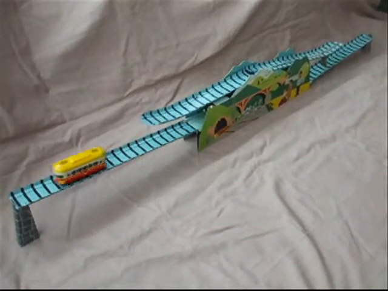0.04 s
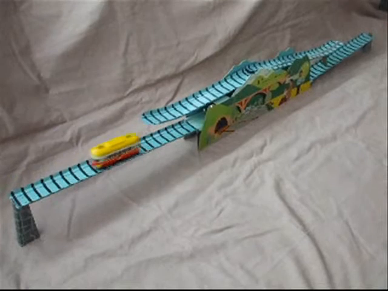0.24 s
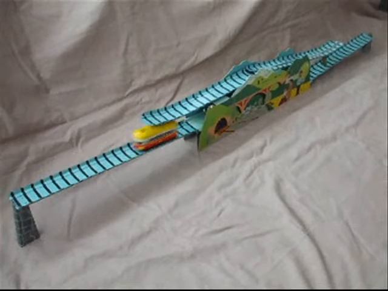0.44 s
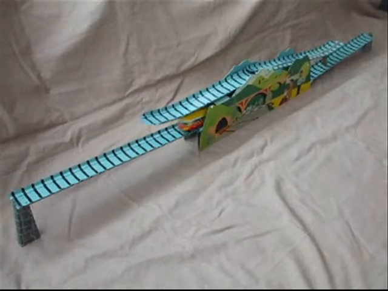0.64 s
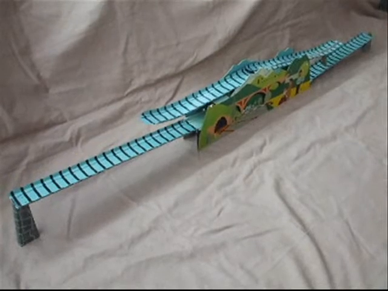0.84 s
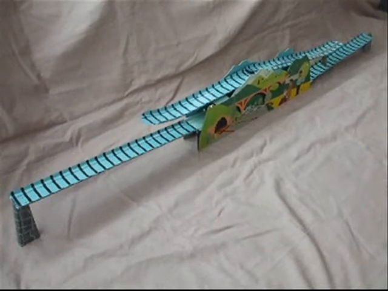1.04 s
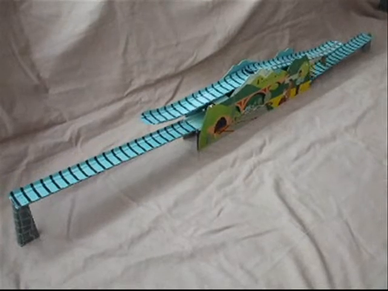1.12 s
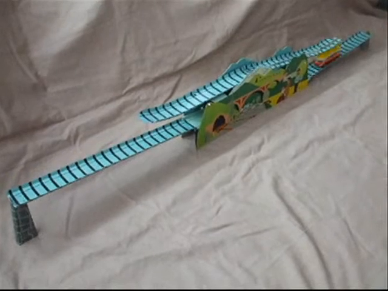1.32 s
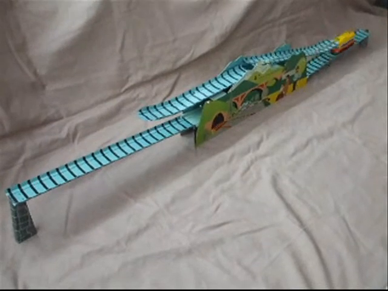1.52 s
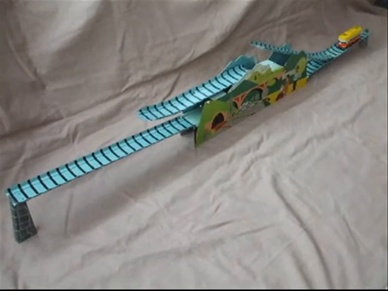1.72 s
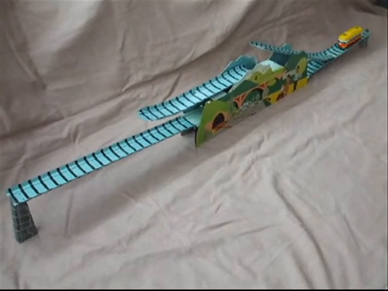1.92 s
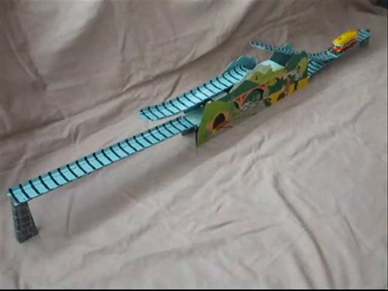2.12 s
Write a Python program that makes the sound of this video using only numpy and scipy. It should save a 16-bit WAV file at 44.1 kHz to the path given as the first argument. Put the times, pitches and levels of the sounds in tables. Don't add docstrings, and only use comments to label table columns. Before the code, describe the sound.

Clockwork toy on metal track: quiet gear chatter and ticking joints build to a booming tinny roar in a tunnel, drop suddenly after sharp knocks, and end in two short clacks, indoors, with harsh lo-fi treble.

```python
import sys
import numpy as np
from scipy import signal
from scipy.fft import rfft, irfft, next_fast_len
from scipy.io import wavfile
from scipy.ndimage import uniform_filter1d

SR = 44100
rng = np.random.default_rng(int(sys.argv[2]) if len(sys.argv) > 2 else 0)


def convert_level_to_amplitude(level_db):
    exponent = np.asarray(level_db, float) / 20
    return 10 ** exponent


def to_wav(sig):
    pcm = np.clip(np.atleast_2d(sig), -1, 1) * 32767
    pcm = np.round(pcm).astype(np.int16)
    wavfile.write(sys.argv[1], SR, pcm.T)


N = 94815


def rms(x):
    return np.sqrt(np.mean(x ** 2))


def unit(x):
    return x / rms(x)


def peak_one(x):
    return x / np.abs(x).max()


def colour(x, points):
    p = np.array(points, float)
    hz = np.maximum(np.arange(2049) * SR / 4096, 1)
    log_gain = np.interp(np.log(hz), np.log(p[:, 0]), p[:, 1]) * np.log(10) / 20
    cepstrum = irfft(log_gain)
    cepstrum[1:2048] *= 2
    cepstrum[2049:] = 0
    return signal.fftconvolve(x, irfft(np.exp(rfft(cepstrum))))[:len(x)]


def ring(x, hz, t60):
    pole = np.exp((2j * np.pi * hz - np.log(1000) / t60) / SR)
    return signal.lfilter([1], [1, -pole], x).imag


def walk(hz):
    return unit(signal.lfilter(*signal.butter(2, hz, fs=SR), rng.standard_normal(N)))


def clicks(per_s, scatter_db):
    chance, sign, strength = rng.random((3, N))
    ticks = (chance < per_s / SR) * np.sign(sign - .5)
    return unit(ticks * convert_level_to_amplitude(-scatter_db * np.log(strength + 1e-4)))


def rings(x, peaks):
    stretch_s, away_db = 0.18, -11.5
    shift_db, shift_hz = 1.2, 12
    sharpen = .88
    t, out = np.arange(N) / SR, 0
    for k, (hz, width_hz, db, loudest_s) in enumerate(peaks):
        away = 1 - np.exp(-((t - loudest_s) / stretch_s) ** 2)
        db = db + away_db * away + shift_db * walk(shift_hz)
        t60 = np.log(1000) / (np.pi * max(sharpen * width_hz, 10))
        out = out + (-1) ** k * np.sqrt(width_hz) * ring(x * convert_level_to_amplitude(db), hz, t60)
    return unit(out)


def gear_chatter(teeth):
    # pitch_hz, level_db
    teeth_colour = [(710, -18.5), (1200, -2), (1780, -6), (2710, -0.5), (3000, -4.5), (4490, -4),
                    (5500, -6), (7150, -55), (12100, -120)]
    # pitch_hz, width_hz, level_db, loudest_s
    body_rings = [(2250, 120, 3, 0.086), (2448, 16, 4.5, 0.16), (2708, 200, 3, 0.57), (3414, 18, -3, 0.27),
                  (3490, 39, 1, 0.63), (3870, 37, -3.5, 0.21), (4135, 66, 3.5, 0.69), (4540, 250, 1, 0.52),
                  (2030, 42, -10, 0.53), (2395, 83, 0, 0.6), (4620, 19, -7, 1.2), (4944, 280, 1, 1.414),
                  (3060, 340, 1, 1.43), (4120, 94, 2, 1.414)]
    ring_db = -1.5
    gears = unit(colour(teeth, teeth_colour)) + convert_level_to_amplitude(ring_db) * rings(teeth, body_rings)
    return convert_level_to_amplitude(-3.5) * gears * rms(teeth)


def track_rumble(wheels, t):
    # pitch_hz, level_db
    track_colour = [(88, -43), (150, -28.5), (481, -8.5), (532, -6.5), (805, -1.5), (1280, -16),
                    (1430, -19.5), (3000, -22), (3900, -41), (6600, -120)]
    # pitch_hz, width_hz, level_db, loudest_s
    track_rings = [(402.4, 13, -5, 0.11), (602, 39, -4.5, 0.83), (655, 14, -24, 0.16), (836, 61, 3, 0.31),
                   (945, 84, -13, 0.39), (1081.5, 6.1, 1.5, 0.12), (1081.5, 78, 6, 0.61),
                   (1233, 75, 3, 0.13), (460, 71, -1.5, 0.81), (570, 190, -3.5, 1.28), (736, 137, 2, 1.71),
                   (1057, 19, -1, 1.74), (1233, 105, 1.5, 1.67), (727, 40, 2, 1.87)]
    # pitch_hz, width_hz, level_db, loudest_s
    tunnel_rings = [(427, 93, -21, 1.3), (612, 20, -11, 0.84), (672, 25, -4, 1.065), (742, 9.9, 0.5, 1.036),
                    (815, 50, 2, 0.98), (838, 11, -3, 1.25), (964, 81, -6.5, 0.82), (1042, 9.4, -5, 1.03),
                    (1087, 9.2, -5, 0.66), (1184, 75, -3, 1.07), (1350, 110, -2, 0.89), (1504, 75, -4, 1),
                    (1604.5, 56, -5, 1.026), (1945, 72, -6, 0.93)]
    tunnel_in_s, tunnel_out_s, enter_s, leave_s = 0.777, 1.31, 0.05, 0.0081
    ring_db, rumble_db = 1.5, -2
    entered = np.clip((t - tunnel_in_s) / enter_s + .5, 0, 1)
    inside = entered * np.clip((tunnel_out_s - t) / leave_s + .5, 0, 1)
    outdoors, indoors = wheels * np.sqrt(1 - inside), wheels * np.sqrt(inside)

    track = convert_level_to_amplitude(rumble_db) * rms(wheels) * unit(colour(wheels, track_colour))
    track = track + convert_level_to_amplitude(ring_db) * rms(outdoors) * rings(outdoors, track_rings)
    track = track + convert_level_to_amplitude(ring_db) * rms(indoors) * rings(indoors, tunnel_rings)

    even = int(.07 * SR)

    def power(x):
        return uniform_filter1d(uniform_filter1d(x ** 2, even), even)

    return convert_level_to_amplitude(-2.0) * track * np.sqrt(2 * power(wheels) / power(track))


def car(t):
    # start_s, gear_chatter_db, track_rumble_db
    run = [(0, -47, -46.5), (.11, -41, -40), (.19, -40, -39.5), (0.269, -33, -36), (.48, -34, -36),
           (0.562, -29.5, -33), (0.632, -33.5, -38), (.68, -29, -32.5), (0.899, -26.5, -24.5),
           (1.12, -25, -19), (1.297, -23.5, -26), (1.32, -31, -38), (1.48, -37.5, -37), (1.538, -31, -38.5),
           (1.63, -41.5, -41), (1.81, -48, -48), (1.899, -44, -40.5), (2.0, -63, -59)]
    s, gear_db, track_db = np.array(run).T
    flicker_db, flicker_hz = 1.58, 26
    teeth, wheels = clicks(5000, 1.9), clicks(3000, 1.7)
    shake = flicker_db * walk(flicker_hz)
    teeth = teeth * convert_level_to_amplitude(np.interp(t, s, gear_db) + shake)
    wheels = wheels * convert_level_to_amplitude(np.interp(t, s, track_db) + 0.17 * shake)
    return gear_chatter(teeth), track_rumble(wheels, t)


def hits():
    # start_s, peak_db, ring_hz, bouncing_s
    blows = [(0.0662, -30.5, 2100, 0.015), (0.0931, -23.5, 3540, 0.0041), (0.1106, -21.5, 3670, 0.0085),
             (0.186, -33, 2250, 0.0077), (0.2132, -27, 2520, 0.011), (0.384, -45, 3180, 0.014),
             (0.4144, -22.5, 4240, 0.032), (0.5175, -24, 5100, 0.018), (0.536, -17, 4600, 0.013),
             (0.558, -23, 2780, 0.012), (0.59, -17.5, 2720, 0.012), (0.638, -17, 2860, 0.014),
             (0.6619, -13.5, 2760, 0.01), (0.682, -19, 2780, 0.0068), (0.789, -14.5, 1370, 0.045),
             (0.8609, -16.5, 3400, 0.01), (0.9093, -16, 2100, 0.016), (1.0306, -12, 3230, 0.1),
             (1.2355, -12.5, 5070, 0.026), (1.3117, -10.5, 4850, 0.028), (1.3386, -10.5, 4620, 0.039),
             (1.3566, -18, 3900, 0.05), (1.5127, -24, 3540, 0.034), (1.533, -19, 4700, 0.01),
             (1.653, -15.5, 4650, 0.0084), (1.6554, -16, 5000, 0.012), (1.6624, -15, 4020, 0.042),
             (1.6804, -31, 4060, 0.017), (1.7185, -21.5, 4240, 0.017), (1.724, -20.5, 3620, 0.019),
             (1.819, -23.5, 3500, 0.0045), (1.8221, -17, 2530, 0.039), (1.8257, -13, 4360, 0.013),
             (1.8375, -16, 4300, 0.0087), (1.8408, -19, 3000, 0.0084), (1.8512, -22.5, 4260, 0.027),
             (1.857, -21, 3000, 0.049), (2.0698, -29.5, 3680, 0.022), (2.1385, -25.5, 4380, 0.012)]
    # pitch_hz, level_db
    knock_colour = [(60, -39), (200, -17.5), (700, -0.5), (1400, -10), (2200, -3), (3200, -1), (4500, 5),
                    (5600, 0.5), (9000, -17.5)]
    # pitch_hz, level_db, t60_s
    tin_modes = [(649, -2, 0.14), (1840, -6, 0.15), (1986, -4.5, 0.11), (2200, -15, 0.065),
                 (2680, -4, 0.22), (3000, 2.5, 0.083), (3446, 3, 0.058), (3310, 1, 0.089), (3970, -7, 0.04),
                 (4240, -1, .12), (4200, -20, .12), (4620, -34, 0.079), (5000, 1, 0.19), (5280, -20, .09)]
    bounces_per_s, bounce_db = 6000, -8
    crunch_s, rise_s = .002, .0007
    knock_db, own_ring_db, own_t60_s = -1, -7, .013
    tin_db, tin_scatter_db = -10.5, 2

    knocks, own = np.zeros((2, N + SR))
    t = np.arange(SR // 8) / SR
    fade_out = np.hanning(2 * len(t))[len(t):]
    for s, db, hz, bounce_s in blows:
        chance, bounce, crunch = rng.random((3, len(t)))
        blow = (chance < bounces_per_s / SR) * (2 * bounce - 1) * convert_level_to_amplitude(bounce_db)
        blow = blow * np.exp(-t / max(bounce_s, .001))
        blow += .5 * (2 * crunch - 1) * np.exp(-t / crunch_s)
        blow *= np.minimum(t / rise_s, 1)

        spot = tin_scatter_db * rng.standard_normal(len(tin_modes))
        tin = 0
        for (mode_hz, mode_db, t60), change_db in zip(tin_modes, spot):
            tin = tin + convert_level_to_amplitude(mode_db + change_db) * ring(blow, mode_hz, t60)

        i = int(s * SR)
        here = slice(i, i + len(t))
        knocks[here] += convert_level_to_amplitude(db + knock_db) * peak_one(colour(blow, knock_colour))
        own[here] += convert_level_to_amplitude(db + own_ring_db) * peak_one(ring(blow, min(hz, 5400), own_t60_s))
        own[here] += convert_level_to_amplitude(db + tin_db) * peak_one(tin) * fade_out
    return knocks[:N], own[:N]


def thump(t):
    # start_s, pitch_hz, level_db, t60_s
    shakes = [(1.318, 62, -37, .12), (1.375, 62, -47, .5), (1.345, 115, -43, .15), (1.232, 190, -41, .15),
              (1.27, 205, -41, .25), (1.315, 170, -39, .15), (1.335, 250, -37, .08), (1.39, 305, -38, .2),
              (1.82, 200, -43, .15), (1.824, 380, -42, .15), (1.85, 640, -38, .4), (1.8255, 4240, -20, .1),
              (1.3388, 4615, -17, .2), (1.3388, 4600, -9, .015), (1.3388, 2200, -14, .012),
              (1.3128, 4680, -10, .03), (1.6545, 1950, -22, .06), (1.8265, 2676, -24, .1)]
    out = 0
    for s, hz, db, t60 in shakes:
        swell = np.sin(np.pi * np.clip((t - s) * hz / 2, 0, 1)) ** 2
        push = swell * np.sin(2 * np.pi * hz * (t - s)) * 2 * hz / SR
        out = out + convert_level_to_amplitude(db) * ring(push, hz, t60)
    return out


def room_echo(x, t):
    t60_s, gap_s, place_s = 0.25, 0.00392, .12
    tail_t = t[:SR // 2]
    fade = convert_level_to_amplitude(-60 * tail_t / t60_s) * (tail_t > gap_s)
    out = 0
    for s in np.arange(0, t[-1] + place_s, place_s):
        here = np.cos(np.pi / 2 * np.clip((t - s) / place_s, -1, 1))
        tail = rng.standard_normal(SR // 2) * fade
        out = out + signal.fftconvolve(x * here, tail)[:N]
    return out / np.sqrt(np.sum(fade ** 2))


def room_tone():
    # pitch_hz, level_db
    air_colour = [(15, -10), (65, -5), (110, -14), (200, -6.5), (700, -8), (1300, -10.5), (5500, -20.5),
                  (9000, -33)]
    return unit(colour(rng.standard_normal(N), air_colour)) * convert_level_to_amplitude(-49)


def scene():
    track_to_room_db, echo_db, body_hz = -0.5, -4, 270
    t = np.arange(N) / SR
    gears, track = car(t)
    knocks, own = hits()
    bright = gears + knocks
    echo = room_echo(bright + convert_level_to_amplitude(track_to_room_db) * track, t)
    toy = bright + own + track + convert_level_to_amplitude(echo_db) * echo
    no_bass = signal.butter(2, body_hz, "high", fs=SR, output="sos")
    return (signal.sosfilt(no_bass, toy) + thump(t) + room_tone())[None]


def top_cut(x):
    return signal.sosfilt(signal.butter(12, 16650, fs=SR, output="sos"), x)


def record(dry):
    # pitch_hz, level_db
    treble_gaps = [(10250, 0), (10520, -6), (10760, -30), (11290, -30), (11530, -6), (11800, 0), (15430, 0),
                   (15560, -26), (15900, -50)]
    alias_hz, hold, offset = 6200, 4, -.0036
    x = signal.sosfilt(signal.butter(6, alias_hz, fs=SR, output="sos"), dry)
    x = np.repeat(x[:, ::hold], hold, axis=1)[:, :N]
    n = next_fast_len(N)
    hz = np.arange(n // 2 + 1) * SR / n
    gain = convert_level_to_amplitude(np.interp(hz, *np.array(treble_gaps).T))
    x = irfft(rfft(x, n) * gain, n)[:, :N] + offset
    return top_cut(x)


dry = scene()
out = record(dry)
to_wav(out)
```